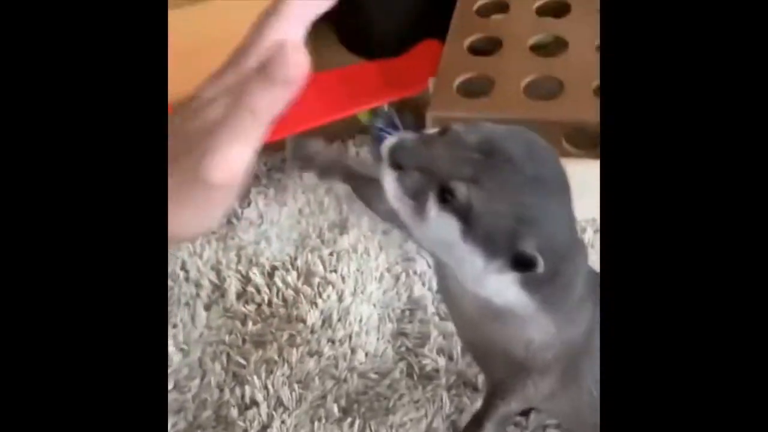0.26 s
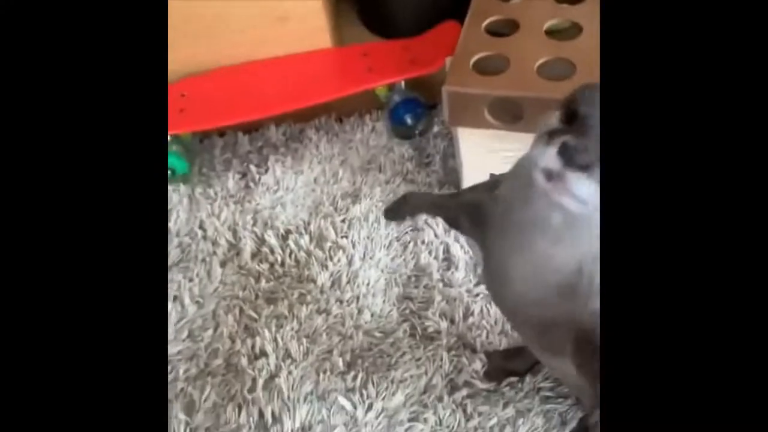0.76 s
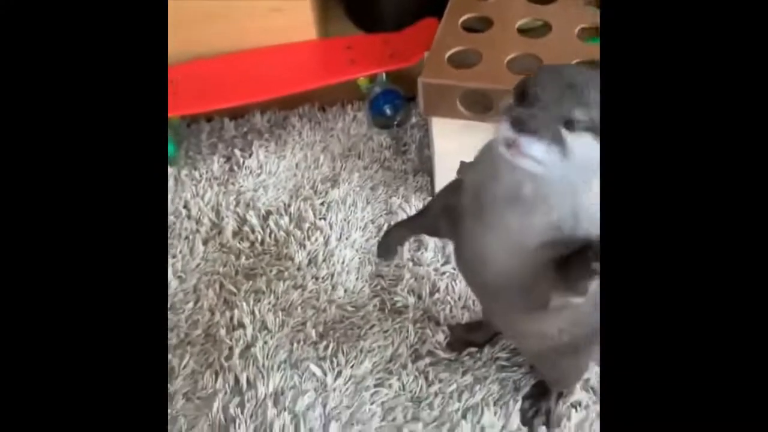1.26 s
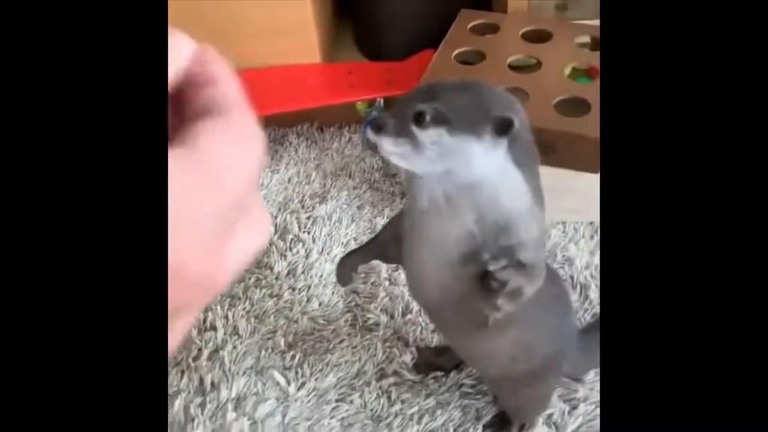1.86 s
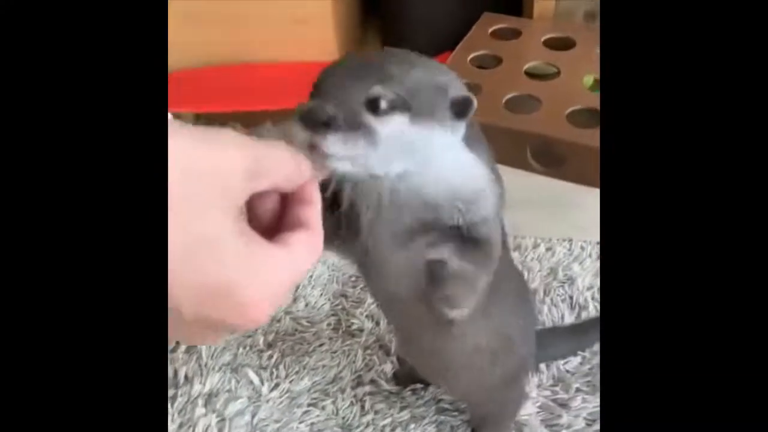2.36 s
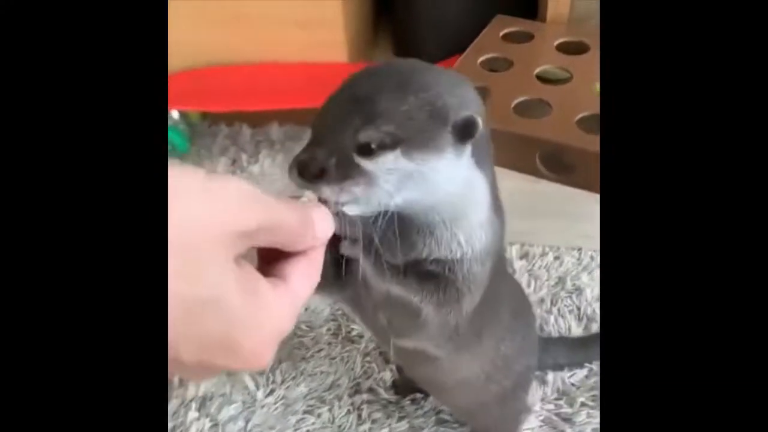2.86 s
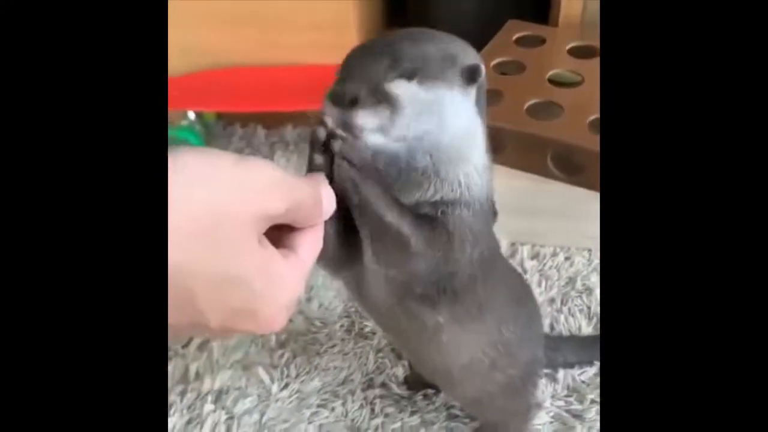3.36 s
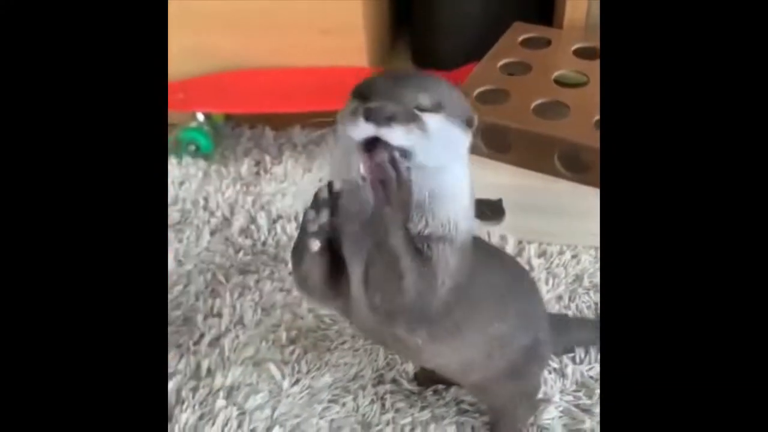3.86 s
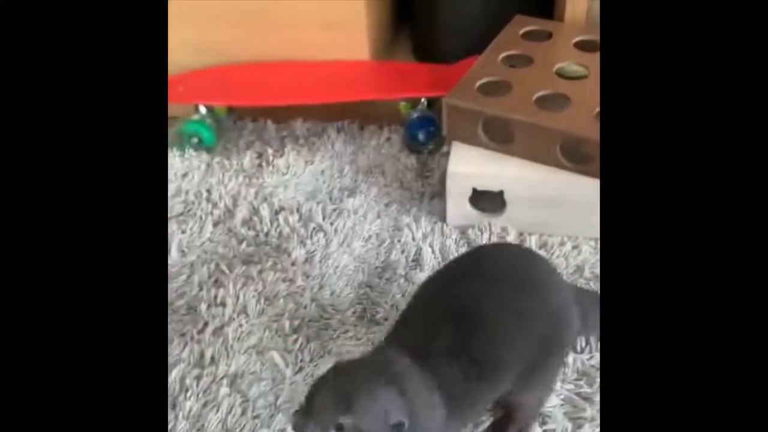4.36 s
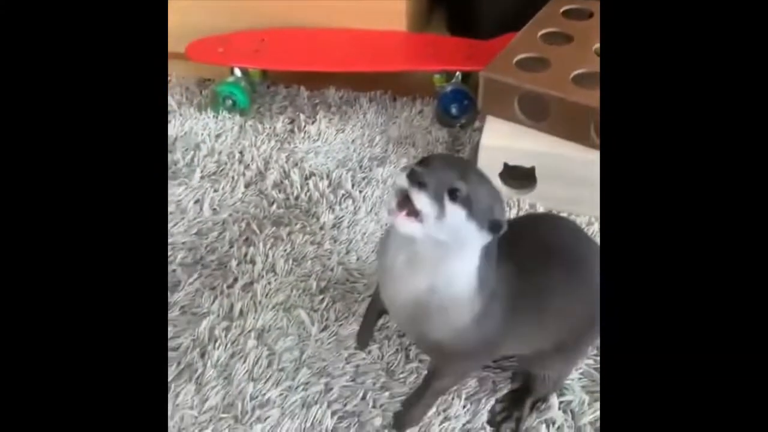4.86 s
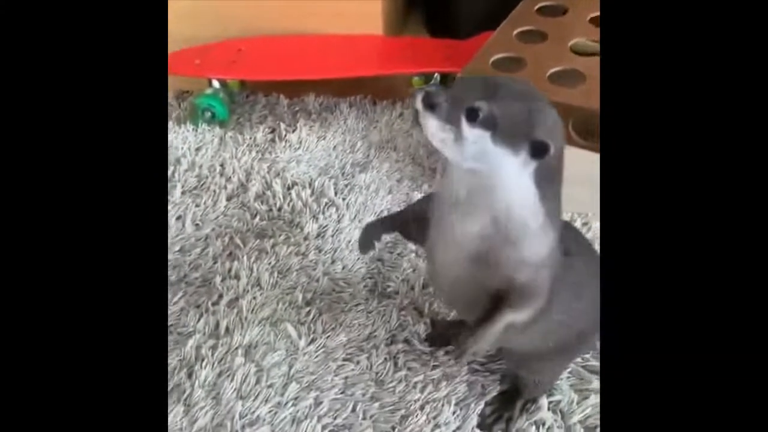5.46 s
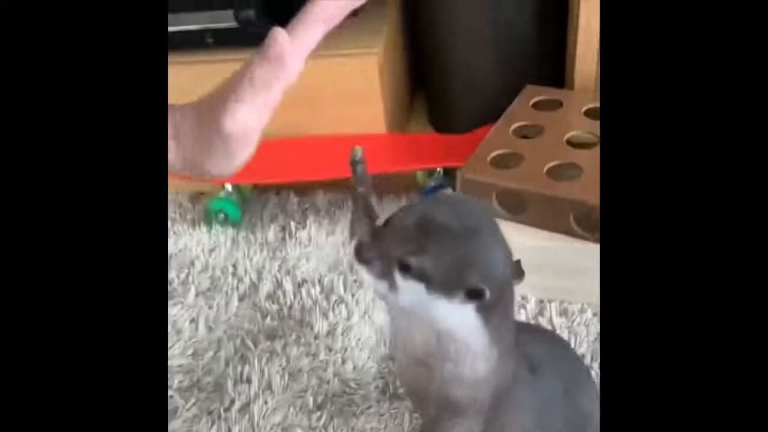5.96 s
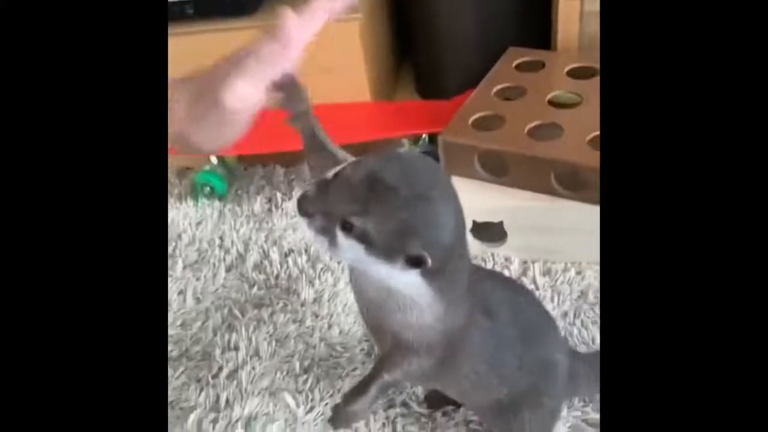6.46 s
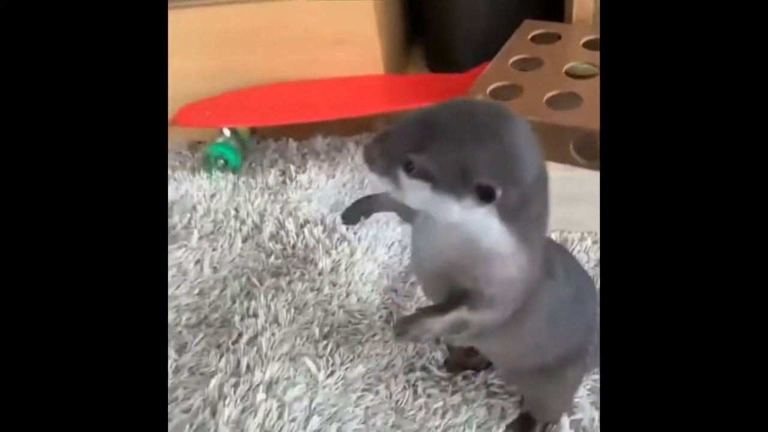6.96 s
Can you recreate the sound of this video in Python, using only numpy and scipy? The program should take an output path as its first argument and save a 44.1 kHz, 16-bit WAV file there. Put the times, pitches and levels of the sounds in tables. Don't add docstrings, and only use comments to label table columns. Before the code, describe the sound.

Short, reedy, trembling otter squeaks, mid-high in pitch and rich in overtones, heard near and dry. First a sharp yelp, then a drawn-out begging call, a pause of soft fur rustle, two short calls around feeding, a run of irregular wet, hollow mouth smacks, and a final long whimper. Small carpeted room with barely any echo, faint low hum and air noise.

```python
import sys
import numpy as np
from scipy import signal
from scipy.io import wavfile
from scipy.ndimage import uniform_filter1d

SR = 44100
rng = np.random.default_rng(int(sys.argv[2]) if len(sys.argv) > 2 else 0)


def persist_wave(psi):
    counts = np.round(np.clip(psi, -1, 1) * 32767).astype(np.int16)
    wavfile.write(sys.argv[1], SR, np.atleast_2d(counts).T)


def gain_from_decibels(decibels):
    exponent = np.asarray(decibels, float) / 20
    return 10 ** exponent


N = 317455


def evened(x):
    return x / np.sqrt(np.mean(x ** 2) + 1e-20)


def read(points, hz):
    f, value = np.transpose(points)
    return np.interp(np.log(hz + 1), np.log(f + 1), value)


def add(mix, s, sound):
    part = mix[:, round(s * SR):][:, :sound.shape[1]]
    part += sound[:, :part.shape[1]]


def resonate(x, hz, width):
    turn = np.exp(2j * np.pi * np.cumsum(hz * np.ones(x.shape[-1])) / SR)
    r = np.exp(-np.pi * width / SR)
    return 2 * (turn * signal.lfilter([1 - r], [1, -r], x / turn)).real


def port_lead(hz, off_axis):
    # (frequency [Hz], phase [radians])
    lead_phase = [(1500, .05), (2400, 1.5), (3300, 3.1), (4500, 4.2), (6000, 5.2), (7200, 6.15),
                  (8300, 6.45), (9700, 8.4), (10500, 9.2), (11500, 10.6)]
    # (frequency [Hz], share [0-1])
    turning_share = [(3500, 1), (5500, .5), (7000, 0)]
    return read(lead_phase, hz) * (1 + (off_axis - 1) * read(turning_share, hz))


def noise(size, level_db, same, off_axis, patchy_db):
    hop = size // 4
    frames = N // hop + 5
    hz = np.fft.rfftfreq(size, 1 / SR)[:, None]
    t = np.arange(frames) * hop / SR
    a, b, c, d, patches = rng.standard_normal((frames, len(hz), 5)).T
    patches = uniform_filter1d(patches, size=8, axis=0)
    patches = evened(uniform_filter1d(patches, size=10, axis=1))
    left = a + 1j * b
    like = np.clip(same(hz), -1, 1)
    lag = np.exp(-1j * port_lead(hz, off_axis(t)))
    right = lag * like * left + np.sqrt(1 - like ** 2) * (c + 1j * d)
    z = np.array([left, right]) * gain_from_decibels(level_db(hz, t) + patchy_db * patches)
    return signal.istft(z, nperseg=size, noverlap=size - hop)[1][:, :N] / np.sqrt(size)


def squeak(rows, pose):
    # (frequency [Hz], level [dB])
    snout_colour = [(2500, 3), (3200, 3), (3750, -8), (4700, 1), (5600, -3), (6400, -10), (7600, -9),
                    (9500, -12), (11500, -15)]
    tremor, rise_ms = .0026, 0.72
    shadow_hz, shadow_width_hz, shadow_db = 6110, 840, -7
    off_axis, pan_db, puff_db, upper_db, bright_db = pose
    s, *columns = np.transpose(rows)
    t = np.arange(s[0], s[-1], 1 / SR)
    hz, voice_db, mouth_db = (np.interp(t, s, c) for c in columns)

    lowest_db = [voice_db, voice_db - 2 + 0.48 * mouth_db, voice_db + mouth_db]
    wide_db = 0.86 * np.maximum(mouth_db, 0)
    upper_db = upper_db + voice_db + 0.34 * mouth_db + wide_db
    blur = .022 + .02 * np.clip((-58 - upper_db) / 6, 0, 1)

    shake = evened(uniform_filter1d(rng.standard_normal((len(t), 17)), size=300, axis=0)).T
    phase = 2 * np.pi * np.cumsum(hz * (1 + tremor * shake[0])) / SR
    out = np.zeros((2, len(t)))
    for k in range(1, 17):
        partial_hz = k * hz
        lead = port_lead(partial_hz, off_axis) / 2
        angle = k * phase + k
        if k <= 3:
            db = lowest_db[k - 1] + 0.5 * shake[k]
            shade = gain_from_decibels([[pan_db / 2 / k], [-pan_db / 2 / k]])
        else:
            shadow = np.exp(-((partial_hz - shadow_hz) / shadow_width_hz) ** 2)
            db = upper_db + read(snout_colour, partial_hz) + bright_db * np.log2(k / 5)
            db = db + shadow_db * off_axis * shadow + 3.3 * shake[k]
            shade = gain_from_decibels([[-2.5], [2.]])
            angle = angle + blur * k * shake[k]
        out += shade * np.sqrt(2) * gain_from_decibels(db) * np.cos(angle + np.array([lead, -lead]))

    age = t - t[0]
    puff = evened(signal.lfilter([1, -1], [1, -1.3, .5], rng.standard_normal((2, len(t)))))
    out += gain_from_decibels(puff_db - 60 * age / 0.033) * (puff + puff[::-1] / 2)
    edge = np.clip(np.minimum(age * 1000 / rise_ms, age[::-1] / 0.0012), 0, 1)
    return s[0], out * np.sin(edge * np.pi / 2) ** 2


def smack(peak_db, cavity_hz, tick_db, length_ms):
    t = np.arange(2200) / SR
    crackle = rng.standard_normal((3, len(t))) * gain_from_decibels(0.43 * rng.standard_normal(len(t)))
    crackle = crackle[0] + .35 * crackle[1:]
    crackle[1] = np.roll(crackle[1], 4)
    burst = (1 - np.exp(-t / 0.00013)) * np.exp(-t * 1000 / max(length_ms, 1))
    falling_hz = cavity_hz * (0.74 + .5 * np.exp(-t / 0.0051))
    cavity = evened(resonate(resonate(crackle, falling_hz, 650.), falling_hz, 650.))
    tick = 0
    for hz, width in [(4500, 7700), (8000, 3200), (10000, 880)]:
        tick = tick + resonate(resonate(crackle, hz, width), hz, width)
    tick = evened(tick) * (np.exp(-t / 0.0011) + 0.26 * burst)
    return 0.3 * gain_from_decibels(peak_db) * (cavity * burst + gain_from_decibels(tick_db) * tick)


def rustle():
    # (peak time [s], peak level [dB], rise [s], fall [s], dullness toward the low mids [dB])
    swells = [(0.019, -57, .016, 0.1, -1), (.16, -82.5, 0.045, 0.1, 4), (.52, -73.5, .03, 0.98, 6),
              (0.813, -56, 0.1, 0.048, 1.5), (1.1, -61.5, 0.74, 1, 3.5), (1.38, -59, 0.2, 0.11, 2),
              (1.63, -69, 0.26, 0.051, -7), (1.83, -72, 0.1, 0.15, 1.5), (1.95, -78.5, .3, 0.92, 2),
              (3.047, -58, 0.13, 0.32, 1.5), (3.888, -81, 0.06, .06, -16), (4.058, -71.5, .2, 0.077, -34),
              (4.135, -74, 0.046, 0.39, 8.5), (4.245, -65.5, 0.065, 0.15, -21),
              (4.54, -63, 0.19, 0.075, 3.5), (4.64, -72, 0.079, 0.13, 3), (5.014, -71, 0.015, 0.097, 0.5),
              (5.238, -72, 0.11, 0.026, -1.5), (5.27, -71.5, 0.029, 0.095, 0.5),
              (5.471, -68.5, .035, 0.046, -4.5), (6.3, -68.5, 0.46, 0.56, 2), (6.7, -67, .5, 0.38, 0),
              (6.968, -77.5, .04, 0.16, 8), (7.118, -83, 0.033, 0.09, -32)]
    # (frequency [Hz], level [dB])
    rub_colour = [(400, -0.5), (900, -3), (2000, 1), (2900, 8), (3500, 7), (4600, 5), (5800, -1),
                  (7500, -4), (9500, -8), (11400, -9), (11900, -52)]
    # (frequency [Hz], left-right likeness [-1 to 1])
    rub_likeness = [(2500, .8), (3300, .93), (4500, .5), (6300, .3), (7300, .95), (8500, .85), (10500, .45)]
    # (from time [s], off-axis factor [0-1.5])
    body_places = [(0, 1.3), (.4, .97), (.92, .8), (2.85, 1.15), (3.85, .93), (4.98, .94), (5.9, 1.1)]
    s, peak_db, rise_s, fall_s, dull_db = np.transpose(swells)[:, :, None]

    def shape_db(hz, t):
        rising = np.maximum((s - t) / abs(rise_s), 0) ** 1.13
        falling = np.maximum((t - s) / abs(fall_s), 0) ** 2.25
        swell_db = peak_db - 32.5 * (rising + falling)
        power = gain_from_decibels(np.maximum(swell_db, -130)) ** 2
        total = power.sum(0)
        dull = (power * np.clip(dull_db, -16, 8)).sum(0) / total
        return read(rub_colour, hz) + 10 * np.log10(total) + dull * np.log2(7000 / (hz + 700))

    def direction(t):
        since, where = np.transpose(body_places)
        return where[np.searchsorted(since, t, side="right") - 1]

    return gain_from_decibels(15) * noise(256, shape_db, lambda hz: read(rub_likeness, hz), direction, patchy_db=2.0)


def room_echo(x):
    taps = np.zeros((2, SR // 2))
    at = np.arange(200, SR // 2 - 20, 20)
    at = at + rng.integers(0, 20, (2, len(at)))
    np.put_along_axis(taps, at, rng.choice([-1., 1.], at.shape), 1)
    hz, t, z = signal.stft(taps, SR, nperseg=256)
    decay_s = read([(500, 0.2), (3000, 0.39), (10000, 0.043)], hz)[:, None]
    tail = signal.istft(z * gain_from_decibels(-60 * t / decay_s), SR, nperseg=256)[1]
    return signal.fftconvolve(x.mean(0)[None], tail / np.linalg.norm(tail[0]), axes=1)[:, :N]


def room_tone():
    # (frequency [Hz], level [dB per Hz])
    air_colour = [(12, -18.5), (40, -7), (65, -1), (95, -13), (131, -10.5), (250, -16.5), (481, -25),
                  (1120, -33), (1800, -42), (3300, -47), (6000, -61), (8500, -57.5), (11300, -58),
                  (11900, -100)]
    # (frequency [Hz], left-right likeness [-1 to 1])
    air_likeness = [(30, .97), (60, .985), (130, .9), (270, .55), (590, .25), (1250, .2), (2300, .4),
                    (3300, .75), (6300, .35), (7200, .95), (8300, .9), (10000, .3)]
    # (frequency [Hz], width [Hz], level [dB])
    hum_modes = [
        (29, 3.7, -46),
        (55.9, 16, -50),
        (126.5, 17.3, -58.5),
        (287.5, 20.6, -65),
    ]
    # (time [s], level [dB])
    whine_levels = [(2.3, -100), (2.7, -70), (6.0, -74.5), (6.2, -100)]
    air = noise(2048, lambda hz, t: read(air_colour, hz) + 0 * t, lambda hz: read(air_likeness, hz),
                lambda t: .98, patchy_db=2.5)
    air = gain_from_decibels(-46.5) * evened(air)
    t = np.arange(N) / SR
    motor_hz, motor_width, motor_db = hum_modes[0]
    steady = np.sqrt(2) * np.sin(2 * np.pi * motor_hz * t)
    waver = evened(resonate(rng.standard_normal(N), motor_hz, motor_width))
    hum = gain_from_decibels(motor_db) * evened(steady + 0.39 * waver)
    for hz, width, db in hum_modes[1:]:
        mode = resonate(resonate(rng.standard_normal(N), hz, width), hz, width)
        hum = hum + gain_from_decibels(db) * evened(mode)
    whine = evened(resonate(rng.standard_normal(N), 1111, 4.3))
    return air + hum + whine * gain_from_decibels(np.interp(t, *np.transpose(whine_levels)))


def thinned(x):
    # (frequency [Hz], margin [dB])
    mask_margin = [(1200, 30), (2500, 12), (4000, 9.5), (6000, 7), (9000, 6), (12000, 6)]
    mid_side = np.array([x[0] + x[1], x[0] - x[1]]) / 2
    hz, t, z = signal.stft(mid_side, SR, window="cosine", nperseg=2048, noverlap=1024)
    power = abs(z[:, :1024]) ** 2
    bands = power.reshape(2, 64, 16, -1).mean(2)
    masker = uniform_filter1d(bands.sum(0), size=5, axis=0)
    top_db = 7. * evened(uniform_filter1d(rng.standard_normal(len(t)), size=2))
    masker[26:] = np.maximum(masker[26:], masker[21:25].mean(0) * gain_from_decibels(top_db))
    mood_db = 3. * evened(uniform_filter1d(rng.standard_normal(bands.shape), size=3, axis=2))
    margin_db = read(mask_margin, hz[8:1024:16])[:, None] + mood_db
    threshold = np.repeat(masker / gain_from_decibels(2 * margin_db), 16, axis=1)
    strong_band = np.repeat(bands, 16, axis=1) > threshold
    z[:, :1024] *= strong_band * (power > threshold * .8)
    mid, side = signal.istft(z, SR, window="cosine", nperseg=2048, noverlap=1024)[1][:, :N]
    return np.array([mid + side, mid - side])


def scene():
    # (off-axis factor [0-1.5], left-right [dB], onset puff [dB], upper partials [dB],
    # brightness [dB per octave])
    poses = [
        (1.4, 6, -60.5, -15.5, -1),
        (0.08, -0.9, -44.5, -21, -3),
        (1.1, 0.7, -49, -17.5, -2),
        (0.91, -2, -51, -30, 7),
        (0.95, 1, -68, -19, -8),
    ]
    # (time [s], pitch [Hz], voice [dB], mouth opening [dB])
    yelp = [(.006, 927, -62, -18), (0.0153, 960, -29.5, -36), (0.018, 800, -35, -24),
            (0.026, 766, -29.5, -21.5), (0.077, 677, -36.5, -22), (0.098, 683, -35, -18),
            (.114, 701, -47, -11), (.126, 721, -46, -16), (.168, 682, -70, -24)]
    beg = [(0.811, 806, -44.5, 10), (0.865, 800, -50.5, 16.5), (.897, 765, -41.5, 2.5),
           (.935, 740, -46, 2.5), (1.016, 726, -43.5, -4), (1.106, 705, -49, -3.5),
           (1.15, 689, -51.5, -21),
           (1.18, 722, -48.5, 0.5), (1.216, 737, -44, 1.5), (1.295, 738, -46.5, 3),
                (1.321, 729.3, -43, -5), (1.422, 716, -47, -4), (1.449, 689, -53.5, -28),
                (1.485, 666, -46.5, -32), (1.503, 645, -62, -25)]
    grab = [(3.05, 797.6, -35.5, 1), (3.09, 798.5, -34, -4.5), (3.134, 765, -38, -5),
            (3.161, 740, -36.5, -10), (3.175, 738, -34.5, -29), (3.225, 733, -35, -20),
            (3.241, 628, -44, -15), (3.247, 614, -45, -32), (3.254, 714, -65, -15)]
    drop_call = [(4.136, 781.4, -33.5, -12.5), (4.181, 793.4, -31, -17), (4.203, 788.4, -35.5, -8.5),
                 (4.232, 692, -41, -14), (4.238, 630, -49.5, -30), (4.257, 650, -42.5, -13),
                 (4.266, 621, -45.5, -19), (4.288, 620, -61, -22)]
    whimper = [(6.06, 701, -57, -9), (6.077, 707, -47.5, -4.5), (6.087, 710, -40.5, 0),
               (6.114, 677, -48, 0), (6.125, 678, -42.5, -7.5), (6.168, 686, -44, -10.5),
               (6.206, 659.4, -42, -19.5), (6.226, 666, -50, -11),
               (6.274, 680.5, -42.5, -21), (6.335, 694, -46, -10), (6.379, 672, -41.5, -30),
                    (6.418, 675, -45, -16.5), (6.485, 683.3, -41, -19), (6.676, 705, -51.5, -6),
                    (6.765, 681.3, -42.5, -19.5), (6.803, 676, -40.5, -43), (6.824, 703, -59, -44)]
    # (time [s], peak [dB], mouth cavity [Hz], tick over the cavity [dB], length [ms])
    smacks = [(0.154, -61, 816, 10, 6.5), (2.715, -41.5, 1250, -12, 2.9), (3.25, -54.5, 1200, 19, 8.8),
              (3.302, -37.5, 838, -19, 9.8), (3.344, -43, 830, -56, 3.4), (3.641, -47, 4500, -14, 7.4),
              (4.408, -42.5, 2350, -34, 8.4), (4.47, -39.5, 1790, -6, 7.9), (4.658, -32.5, 1160, -54, 5.1),
              (4.68, -52.5, 1230, 7, 3.5), (4.7875, -59.5, 1120, 29, 19), (4.813, -45.5, 2110, 13, 13),
              (4.821, -53, 870, 14.5, 39), (4.958, -42.5, 2540, 4, 13), (4.974, -36.5, 1460, -17, 4.1),
              (5.082, -52, 830, 5.5, 9.6), (5.119, -46.5, 2040, 5, 18), (5.13, -31.5, 1010, -13, 4.6),
              (5.291, -38.5, 1930, -9, 5.7), (5.305, -37.5, 1010, -1.5, 12.4), (5.468, -53, 1190, -10, 3.2),
              (5.574, -49, 1590, -31, 8.2), (5.596, -36, 820, -10, 5.5), (7.012, -51, 1230, -36, 5)]
    otter = np.zeros((2, N))
    calls = [yelp, beg, grab, drop_call, whimper]
    for rows, pose in zip(calls, poses):
        add(otter, *squeak(rows, pose))
    for s, *row in smacks:
        add(otter, s - .001, smack(*row))
    return otter + gain_from_decibels(-18.5) * room_echo(otter) + rustle() + room_tone()


def band_limit(x):
    return signal.sosfilt(signal.butter(12, 11850, fs=SR, output="sos"), x)


def record(dry):
    mix = thinned(dry)
    return band_limit(mix)


dry = scene()
out = record(dry)
persist_wave(out)
```